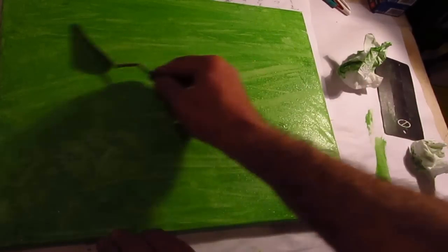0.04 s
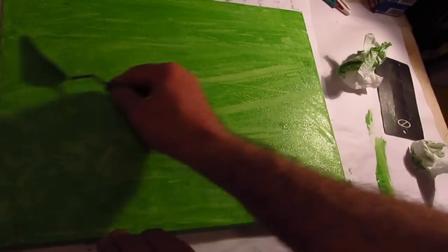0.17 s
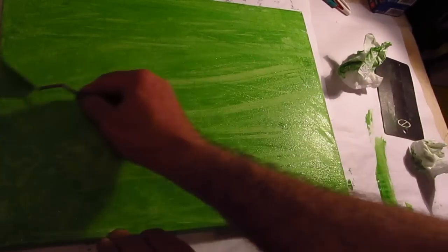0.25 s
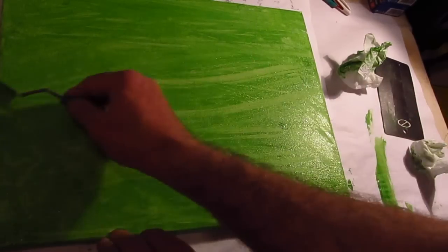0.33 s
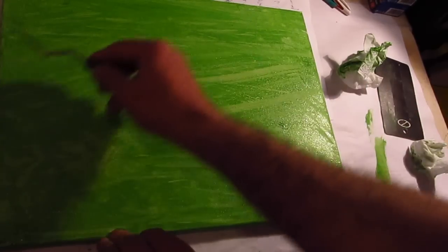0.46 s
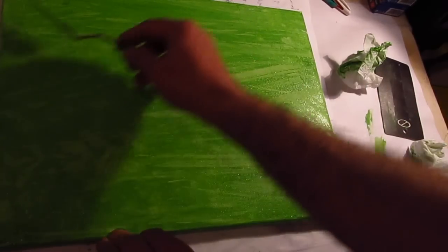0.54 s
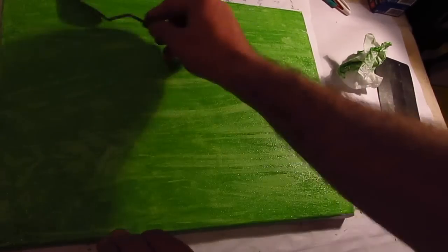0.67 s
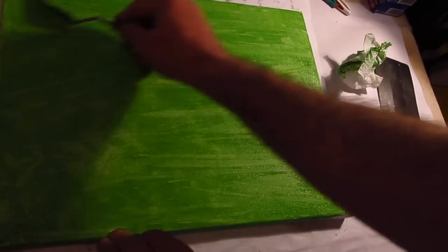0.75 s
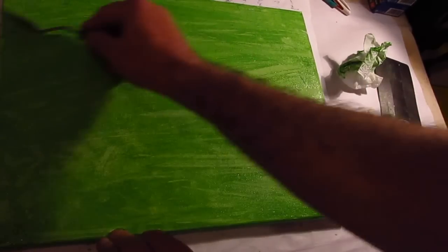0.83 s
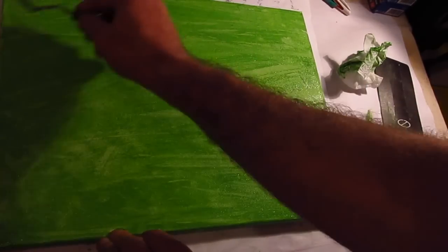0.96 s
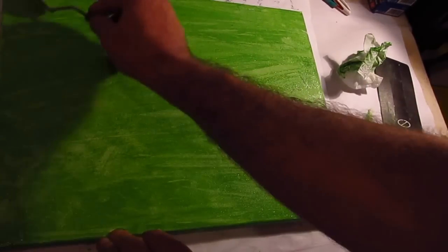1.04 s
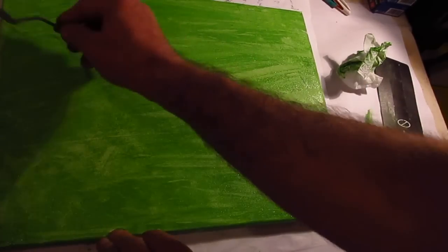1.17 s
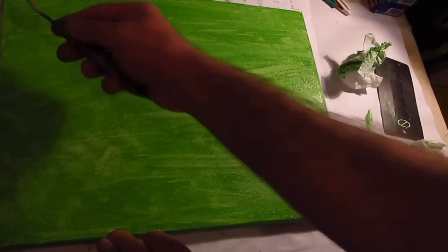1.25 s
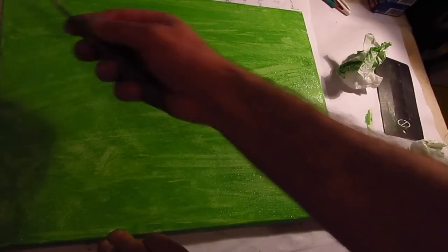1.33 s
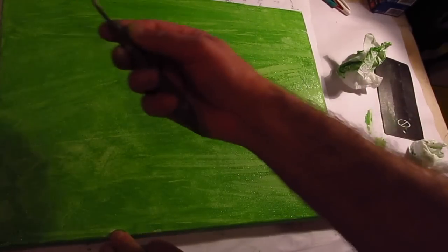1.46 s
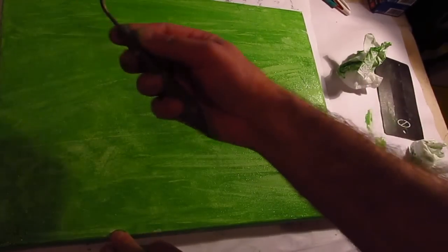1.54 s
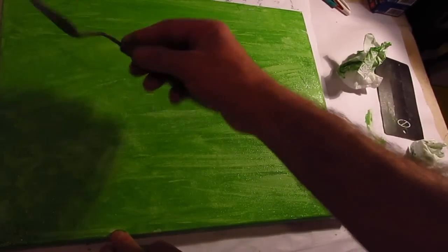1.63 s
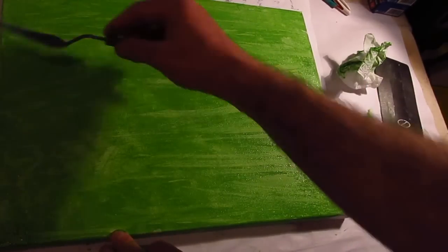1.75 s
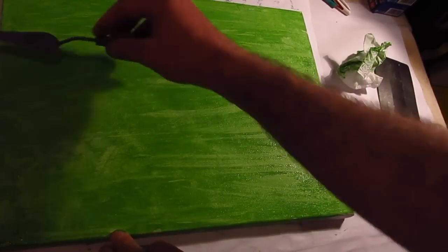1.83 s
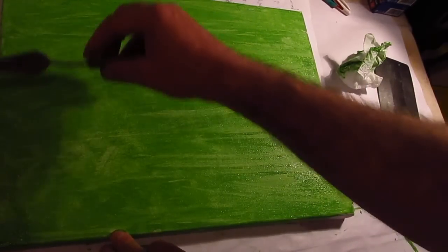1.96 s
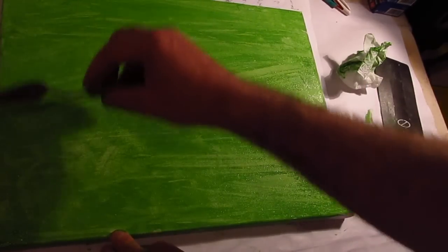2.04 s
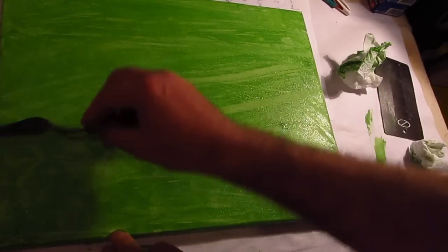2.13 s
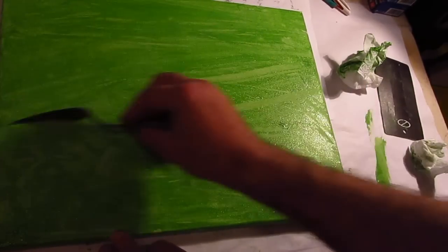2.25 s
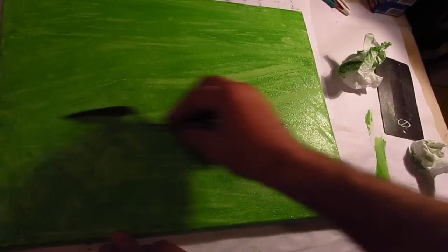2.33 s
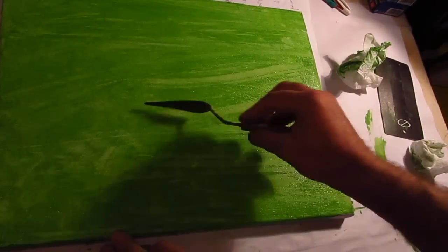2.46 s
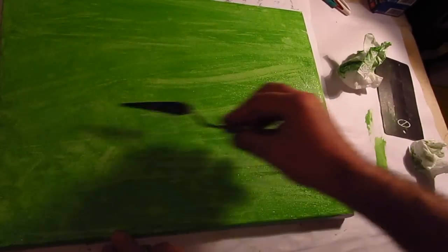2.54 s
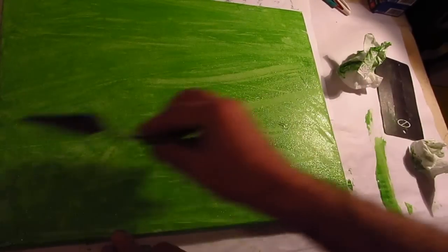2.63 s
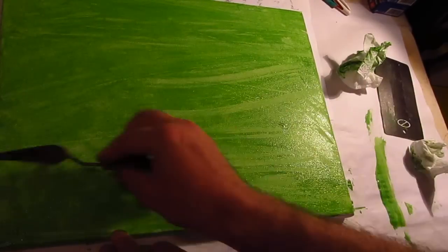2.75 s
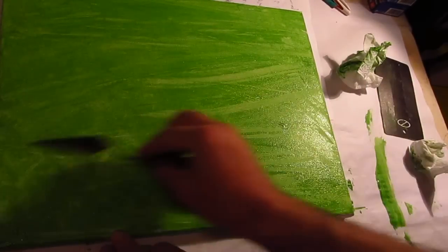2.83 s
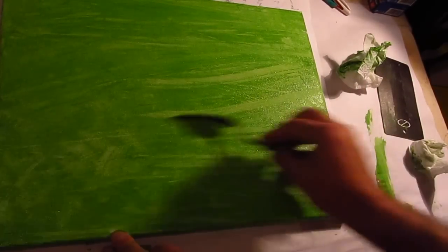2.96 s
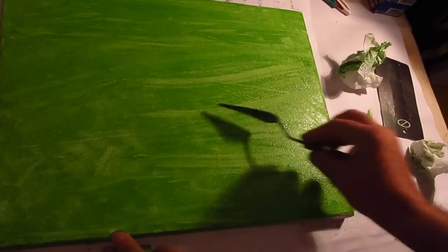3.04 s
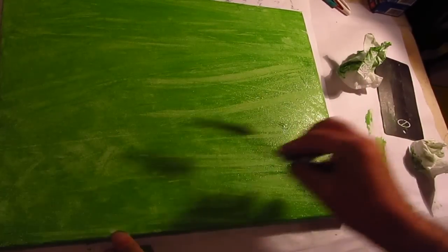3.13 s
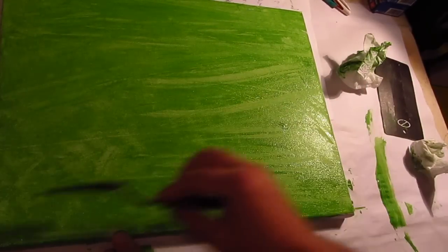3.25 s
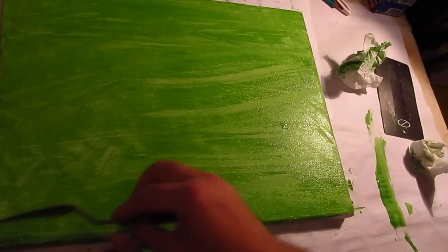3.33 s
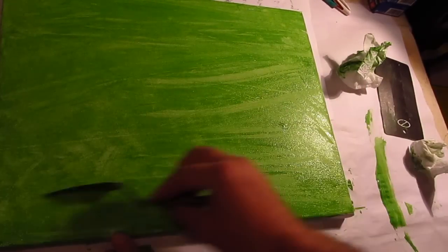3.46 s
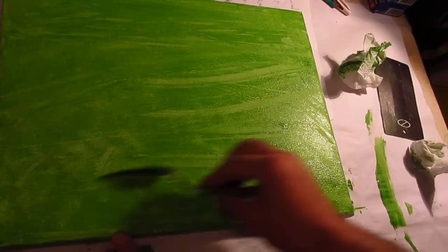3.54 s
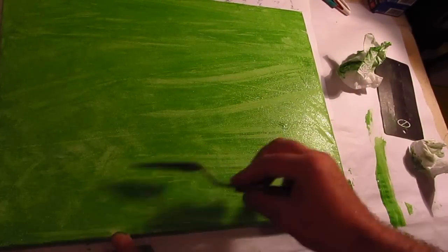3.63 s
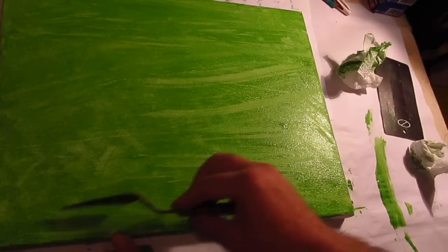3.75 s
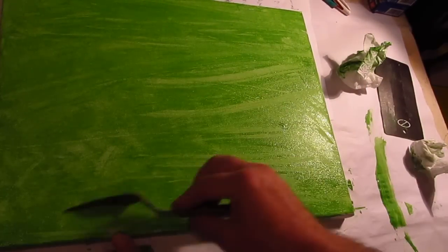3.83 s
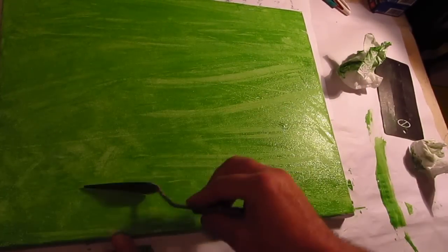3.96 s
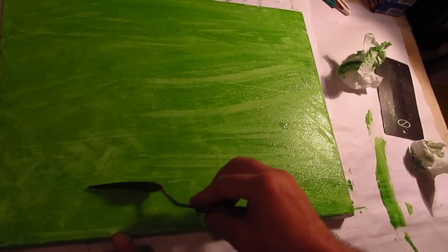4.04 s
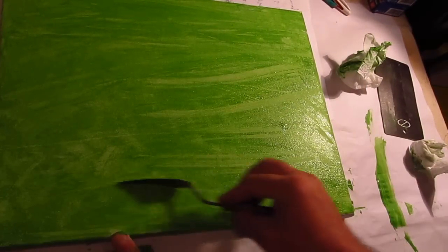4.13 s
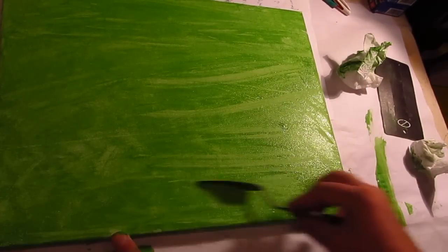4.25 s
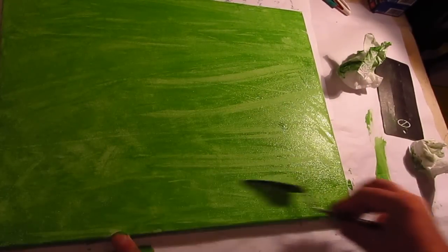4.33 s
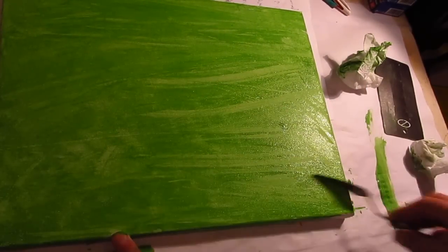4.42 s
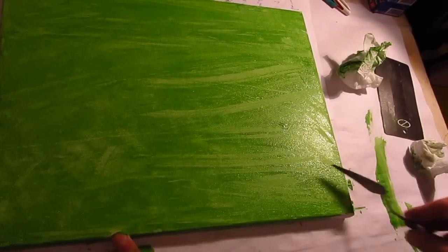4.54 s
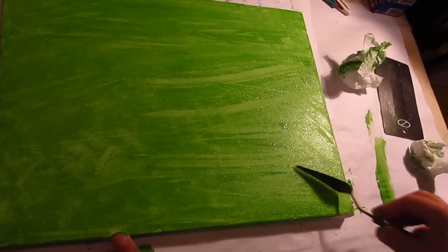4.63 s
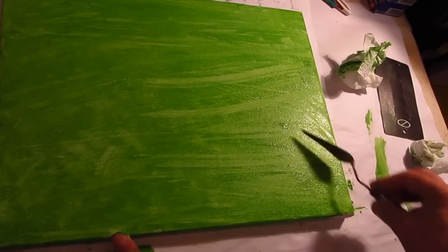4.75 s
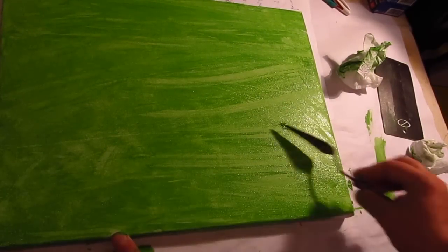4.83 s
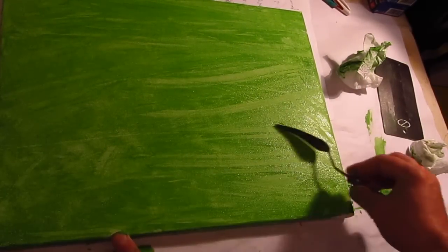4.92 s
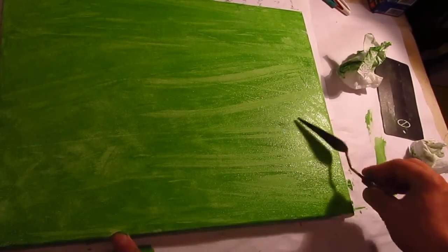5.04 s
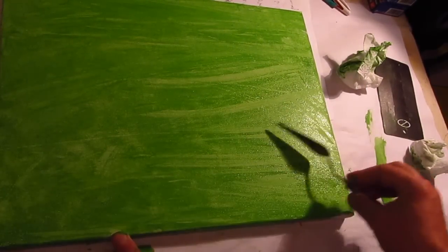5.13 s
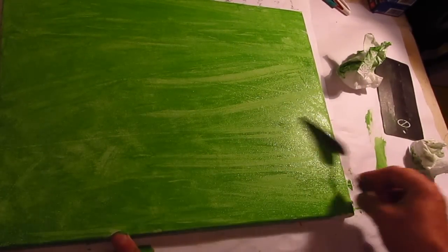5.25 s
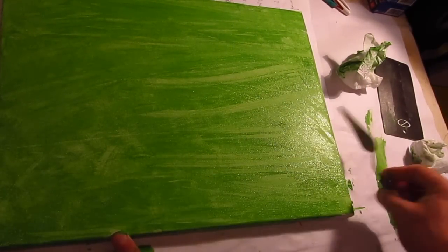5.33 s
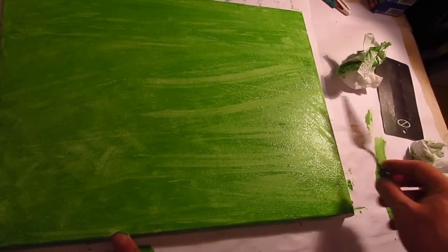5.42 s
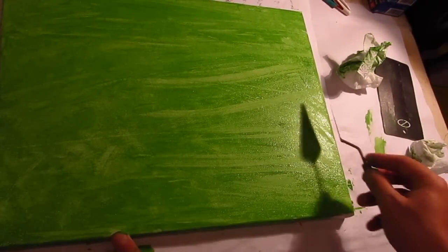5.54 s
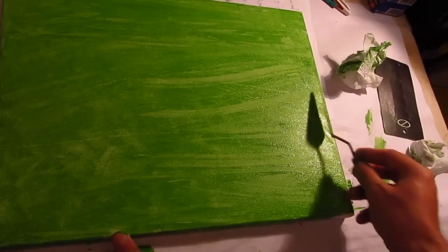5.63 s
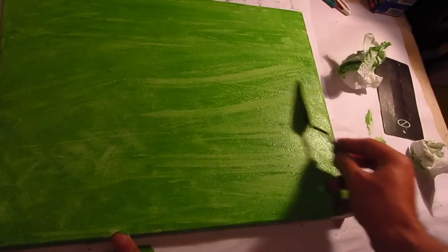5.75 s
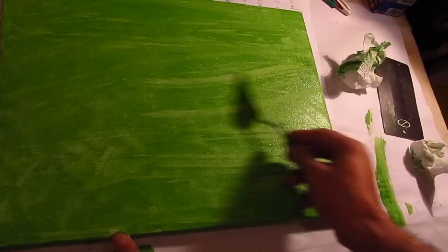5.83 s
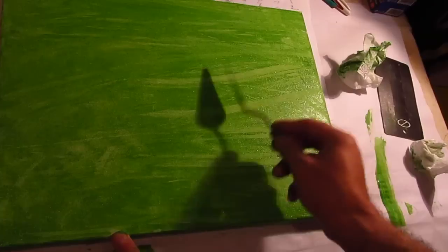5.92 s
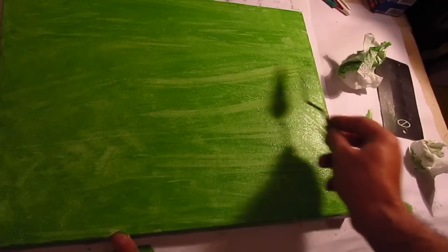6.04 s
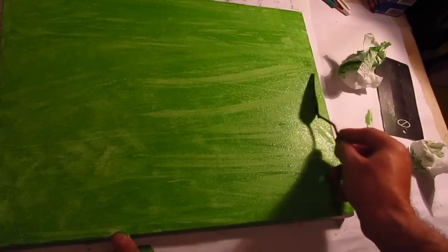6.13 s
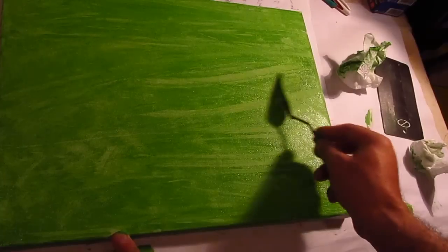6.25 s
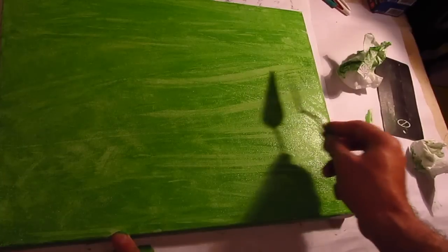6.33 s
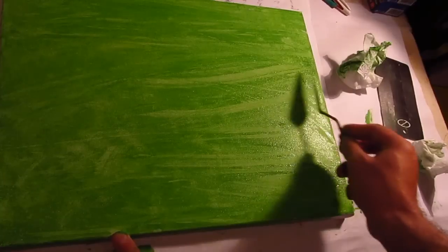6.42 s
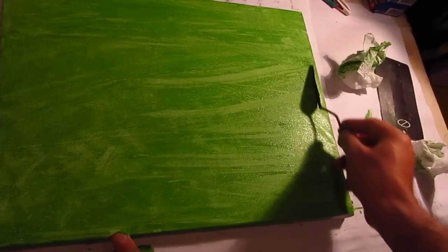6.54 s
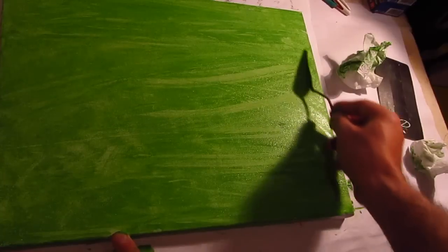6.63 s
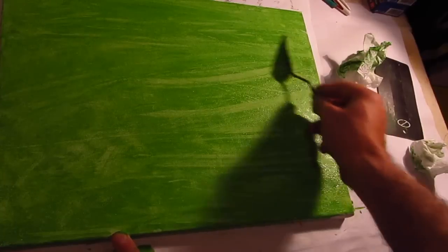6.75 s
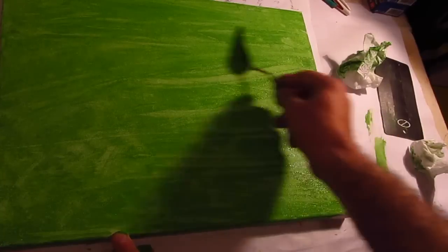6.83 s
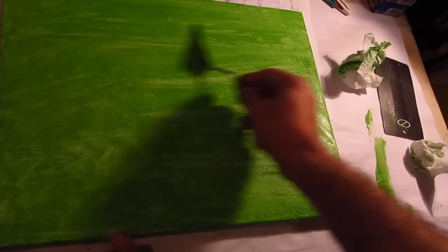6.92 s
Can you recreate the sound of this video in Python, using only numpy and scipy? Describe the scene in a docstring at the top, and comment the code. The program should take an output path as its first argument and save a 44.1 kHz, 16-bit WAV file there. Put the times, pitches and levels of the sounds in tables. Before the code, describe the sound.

Gritty, papery scrapes of a thin flexible metal blade on slack, drum-like cloth, heard in stereo from very near. Strokes are brief and irregular, with soft thumps and ticks at landing and a faint, quickly dying metallic ring on lifting. Pauses of a second or so early on give way to quicker strokes later. The last stroke is long and swells. Soft room air and a weak low hum lie beneath, with a short room reflection.

```python
"""In a small quiet room with a low hum, a steel painting knife spreads wet paint over a stretched canvas.
Fourteen uneven strokes are heard close by. Small drum-like taps come from decaying sines and noise.
The rasp is clicks and noise, coloured by the cloth wherever the blade is, with a buzz from the threads.
The steel rings faintly after it lifts: a few decaying, unsteady sines. Faint swishes are filtered rasp."""
import sys
import numpy as np
from scipy import signal
from scipy.fft import rfft, irfft, next_fast_len
from scipy.io import wavfile

SR = 44100
rng = np.random.default_rng(int(sys.argv[2]) if len(sys.argv) > 2 else 0)


def put_to_file(sound):
    """Save the sound as 16-bit audio at rate SR, in the file named by the first command-line argument."""
    columns = np.atleast_2d(sound).T  # one column per channel
    safe = np.clip(columns, -1, 1)
    whole_steps = np.round(safe * 32767)
    wavfile.write(sys.argv[1], SR, whole_steps.astype(np.int16))


N = 307818  # length of the scene in samples


def amp(db):
    """Turn decibels into a gain."""
    return 10 ** (np.asarray(db) / 20)


def unit(x):
    """Scale to rms 1."""
    return x / np.sqrt(np.mean(x ** 2))


def walk(n, rate):
    """Smooth chance with rms 1 that changes about rate times a second."""
    knots = rng.standard_normal(4096)
    return unit(np.interp(np.arange(n) / SR * rate, np.arange(len(knots)), knots))


def colour(x, points, bumps=()):
    """Filter by a curve of (pitch_hz, level_db) plus broad bumps (pitch_hz, width_octaves, level_db)."""
    size = next_fast_len(x.shape[-1] + 2048)
    octave = np.log2(np.maximum(np.arange(size // 2 + 1) * SR / size, 1))
    hz, db = np.transpose(points)
    curve = np.interp(octave, np.log2(hz), db)
    for centre, width, rise in bumps:
        curve = curve + rise * np.exp(-.5 * ((octave - np.log2(centre)) / width) ** 2)
    spectrum = rfft(x, size) * amp(curve)
    return irfft(spectrum, size)[..., :x.shape[-1]]


def fade(t60, size):
    """A decay of 60 dB in t60 seconds."""
    return np.exp(-np.log(1000) * np.arange(size) / SR / t60)


def ring(hz, t60, size):
    """One struck mode: a sine that dies away."""
    return np.sin(2 * np.pi * hz * np.arange(size) / SR) * fade(t60, size)


def scatter(t60, size):
    """Dense dying reflections of unit energy, different at each ear."""
    tail = rng.standard_normal((2, size)) * fade(t60, size)
    return unit(tail) / np.sqrt(size)


def add(out, x, start):
    """Mix x into out from a given sample on."""
    start = max(int(start), 0)
    n = min(x.shape[-1], out.shape[-1] - start)
    out[:, start:start + n] += x[..., :n]


HUM_HZ = 213.5  # centre of the wavering pitch
AIR_DB, HUM_DB = -55, -62  # levels before their slow wavering
# spectrum of the room air, only its shape matters: pitch_hz, level_db
AIR_SPECTRUM = [(25, -19), (60, -3), (130, -1), (300, 3.5), (600, -0.5), (1300, -5), (2000, -10.5),
                (2350, -13), (2800, -14), (4200, -15), (5500, -23), (7400, -20.5), (10000, -38.5),
                (13000, -49.5)]


def air():
    """Quiet room noise, more alike at both ears in the bass, and a slightly wavering hum."""
    mid = colour(rng.standard_normal(N), AIR_SPECTRUM)
    side = colour(rng.standard_normal(N), AIR_SPECTRUM)
    side = colour(side, [(60, -6.0), (270, -9), (1200, -5.0), (4000, 0.5)])
    noise = (mid + side * np.array([[1], [-1]])) / np.std(mid) * amp(AIR_DB)
    noise_waver = amp(.6 * walk(N, 3))
    hum_phase = 2 * np.pi * np.cumsum(HUM_HZ + 1.5 * walk(N, 9)) / SR
    hum = np.sin(hum_phase) * amp(2 * walk(N, 7))
    return noise * noise_waver + np.sqrt(2) * amp(HUM_DB) * hum


def room(x, room_db=-19, t60=0.23, size=16384):
    """A small furnished room answers shortly after the direct sound."""
    gap = SR // 150  # samples before the first reflection
    walls = np.pad(scatter(t60, size), ((0, 0), (gap, 0)))
    return amp(room_db) * signal.fftconvolve(x, walls, axes=1)[:, :N]


def weave(n, catches_per_s=4500, spread_db=3, smear_db=-2, judder_db=0.9, judder_rate=380):
    """The edge catches on threads in tiny clicks, wet paint smears between them, and the blade judders."""
    caught = rng.random(n) < catches_per_s / SR
    catches = caught * rng.choice([-1, 1], n) * amp(spread_db * rng.standard_normal(n))
    smear = amp(smear_db) * rng.standard_normal(n)
    return (unit(catches) + smear) * amp(judder_db * walk(n, judder_rate))


def travel(x, cloth_t60=0.043, echo_db=-2, size=5120):
    """Waves bounce across the cloth; their pattern changes as the contact point slides along."""
    out, hop = np.zeros((2, len(x))), size // 2
    for centre in range(0, len(x) + hop, hop):
        start = max(centre - hop, 0)
        at = np.arange(start, min(centre + hop, len(x)))
        piece = x[at] * np.cos(np.pi * (at - centre) / size)  # overlapping pieces blend the patterns
        bounces = scatter(cloth_t60, size=1024)
        add(out, signal.fftconvolve(piece[None], bounces, axes=1), start)
    return x + amp(echo_db) * out


def scrape(n):
    """Tip and heel of the edge rasp separately; the ears differ most in the bass and are most alike near 1 kHz."""
    tip = travel(weave(n))
    mid, side = tip.mean(axis=0), (tip[0] - tip[1]) / 2
    heel = amp(-2.5) * weave(n)
    side = colour(side + heel, [(300, 3.5), (1000, -6.0), (2500, -3.0), (8000, -0.5)])
    return mid + side * np.array([[1], [-1]])


# moments when the blade barely grazes the paint: middle_s, length_s, level_db (before fading in and out),
# resonance_hz
SKIMMING_MOMENTS = [(0.503, 0.084, -59.5, 3980), (1.77, 0.49, -59, 2330), (2.651, 0.22, -59.5, 4515),
                    (3.249, 0.093, -53, 3580), (3.679, 0.044, -49.5, 2880), (3.735, 0.075, -50, 2870)]


def grazes():
    """Faint swishes as the blade skims the surface between strokes."""
    out = np.zeros((2, N))
    for middle_s, length_s, level_db, resonance_hz in SKIMMING_MOMENTS:
        n = int(length_s * SR)
        swish = colour(scrape(n), [(500, -17), (2400, 4.5), (7500, -2.5), (12000, -21.0)],
                       [(resonance_hz, .06, 10)])
        add(out, unit(swish) * np.hanning(n) * amp(level_db), (middle_s - length_s / 2) * SR)
    return out


# the whole canvas as a slack drum, strength before each tap's own: pitch_hz, level_db
DRUM_MODES = [(184, -18.5), (295, -2), (370, -6.5), (460, -18.5)]
# shorter waves in the canvas: pitch_hz, level_db, t60_s
CANVAS_MODES = [(835, -7, 0.055), (924, 10, 0.0081), (1300, -6, 0.032), (1610, -8.5, 0.046),
                (2150, -5.5, 0.012), (2890, -11.5, 0.05)]
# the blade lands or knocks, 2 ms after start_s: start_s, peak_db, drum_db (before the common drum gain),
# drum_t60_s, tick_db (edge tick, before the common tick gain), snap_db (treble bump of the tick)
LANDINGS = [(.698, -25.5, -16, .08, -11, -1), (1.061, -18, -10.5, 0.048, -9.5, -8),
            (2.076, -41, -13, 0.045, -37, -3), (2.168, -13, -17, .1, -20.5, -0.5),
            (2.793, -17, -23, .075, -20, -3), (3.44, -16, -17.5, .083, -10, 3.5),
            (3.731, -33.5, -10, .05, 1, -1), (3.825, -12.8, -29, 0.075, -19.5, 4.5),
            (4.037, -37, -11, 0.062, -24, -3), (4.671, -12, -2, 0.035, -9, -6),
            (4.904, -19, -27, .085, -22, 1), (5.203, -17.5, -25.5, .13, -19.5, 4),
            (5.699, -23.5, -23.5, 0.11, -25.5, 0), (6.135, -19, -28.5, .09, -11, 6.5),
            (6.495, -30, -20, .056, -18, 12), (6.798, -11, -28, .09, -21, 0)]


def taps(drum_gain_db=19, tick_gain_db=14, tick_t60=0.033, drum_rise_s=0.0084, size=8192):
    """The landing blade thumps the cloth like a slack drum, with a short steel tick on top."""
    out = np.zeros((2, N))
    swell = 1 - np.exp(-np.arange(size) / SR / drum_rise_s)  # the whole cloth takes a moment to move
    no_bass = signal.butter(2, 160, "high", fs=SR, output="sos")
    for start_s, peak_db, drum_db, drum_t60, tick_db, snap_db in LANDINGS:
        drum = [(hz, mode_db + drum_db + drum_gain_db, drum_t60) for hz, mode_db in DRUM_MODES]
        modes = drum + CANVAS_MODES
        detune = 1 + 0.045 * rng.standard_normal(len(modes))
        place_db = 2.3 * rng.standard_normal(len(modes))  # each spot favours other modes
        cloth = 0
        for k, (hz, mode_db, t60) in enumerate(modes):
            rise = swell if k < len(drum) else 1
            sign = (-1) ** k
            cloth = cloth + amp(mode_db + place_db[k]) * rise * sign * ring(hz * detune[k], t60, size)
        tick = colour(rng.standard_normal((2, size)) * fade(tick_t60, size),
                      [(300, -20.5), (1000, 12.5), (3500, 11.0), (5500, 4.5), (11000, -13)],
                      [(9500, 0.61, snap_db)])
        # the taps carry no deep bass
        tap = signal.sosfilt(no_bass, cloth + amp(tick_db + tick_gain_db) * tick)
        peak = np.abs(tap.mean(axis=0)).max()
        add(out, tap / peak * amp(peak_db), (start_s + 0.002) * SR)
    return out


# modes of the free steel blade, in four families (bending, twisting, tip, upper modes), each a list of:
# pitch_hz, level_db, t60_s
BLADE_FAMILIES = [
    [(2363, 0, .16), (2934, -12, .14), (3774, -16, .26)],
    [(2657, 0, .14)],
    [(7556, 0, .22)],
    [(5065, -7, .11), (6481, -2, .12), (8175, -4, .12), (8890, -4, .11), (9590, -12, .11),
     (10480, -12, .12)],
]


def blade(since_lift, family_db, lift_s=0.02, waver_hz=10, waver_db=1.6):
    """Wet paint damps the steel until it lifts; then it rings briefly, unsteady in the hand."""
    n, out = len(since_lift), 0
    freed = np.exp(np.minimum(since_lift, 0) / lift_s)
    for family, level_db in zip(BLADE_FAMILIES, family_db):
        for hz, db, t60 in family:
            cycles = np.cumsum(hz + waver_hz * walk(n, 90)) / SR
            phase = 2 * np.pi * (cycles + rng.random((2, 1)) / 3)  # each ear has its own phase
            decay = np.exp(-np.log(1000) * np.maximum(since_lift, 0) / t60)
            out = out + np.sin(phase) * decay * amp(level_db + db + waver_db * walk(n, 69.3))
    return np.sqrt(2) * freed * out


def threads(hz, overtone_db=-7, uneven_db=3):
    """The edge bumps over unevenly spaced threads: a rough buzz whose pitch follows the speed."""
    phase = 2 * np.pi * np.cumsum(hz * (1 + .08 * walk(len(hz), 160))) / SR
    tone = np.sin(phase) + amp(overtone_db) * np.sin(2 * phase)
    return unit(tone * amp(uneven_db * walk(len(hz), 119.8)))


def cloth_resonance(t, hz, glide_hz_per_s, width_hz=130, drift=0.04):
    """Cloth between blade and frame rings in a narrow band that slides and comes in patches."""
    n = len(t)
    phase = 2 * np.pi * np.cumsum((hz + glide_hz_per_s * t) * (1 + drift * walk(n, 14))) / SR
    patches = amp(3.5 * walk(n, 25))
    band = walk(n, width_hz) * np.cos(phase) + walk(n, width_hz) * np.sin(phase)
    return unit(band * patches)


# moments when the edge sticks and breaks free in mid-stroke: middle_s, jump_db (change in level)
STICKING_MOMENTS = [(2.472, 4), (2.962, 5.5), (3.028, 3), (4.134, 3), (4.214, -3), (4.343, 1.5),
                    (4.501, 6.5), (4.947, 7), (5.061, -2), (5.241, 6.5), (5.723, 3), (5.744, 6.5),
                    (6.191, 1), (6.537, 0.5), (6.586, -1), (6.646, 2)]


def snags(width_s=0.004):
    """Gain of the strokes: it jumps for a moment wherever the edge sticks and breaks free."""
    t = np.arange(N) / SR
    jumps_db = 0
    for middle_s, jump_db in STICKING_MOMENTS:
        jumps_db = jumps_db + jump_db * np.exp(-np.minimum(((t - middle_s) / width_s) ** 2, 20))
    return amp(jumps_db)


FLICK_S = 0.0097  # half-width of the flick as the blade leaves


def effort(t, length, level_db, swell_s, swell_db, ease_db, flick_db):
    """Level of a stroke in dB: it swells smoothly, eases off towards the end and leaves with a flick."""
    rising = np.cos(np.pi / 2 * np.minimum(t / swell_s, 1)) ** 2
    easing = np.clip((t - swell_s) / max(length - swell_s, 1 / SR), 0, 1) ** 2
    flick = np.exp(-((t - length) / FLICK_S) ** 2)
    return level_db - swell_db * rising - ease_db * easing + flick_db * flick


RELEASE_DB_PER_S = 426  # how fast the rasp dies after the stroke
# the blade skips unevenly, most of all while it touches lightly (the second is per 10 dB below full effort)
SKIP_DB, LIGHT_SKIP_DB, SKIPS_PER_S = -0.24, 0.97, 91
# the edge crosses the threads faster the harder it is pushed; above OUTRUN_HZ it hardly drives the drum
THREAD_RATE_DB_PER_DB, OUTRUN_HZ = 0.24, 470
PAN_LEFT_DB, PAN_RIGHT_DB = 1, -2.5  # left minus right level at the left and right edges of the canvas
LEFT_LAG_MS = -0.046  # delay of the left ear at the left edge; negative means it hears first
# spectrum of steel on painted weave, only its shape matters: pitch_hz, level_db
RASP_SPECTRUM = [(110, -75.5), (190, -42.5), (300, -12), (450, -20), (600, -8.5), (720, -12.5), (830, 1),
                 (1050, 1.5), (1400, 0), (2300, -0.5), (3000, 0.5), (5500, -1), (9800, -7), (11900, -25)]


def stroke(t, effort_db, length, lie, rasp_db=0.36, thread_chop_db=1.0):
    """A rasp coloured by the lie of the blade; faster sliding is louder, brighter and higher in pitch."""
    (place, drum, frame, cloth, flex, hiss, steel_low, steel_middle, steel_high, bright_per_db,
     top_hz, buzz_db, resonance_hz, glide_hz_per_s, resonance_db, *ring_db) = lie
    level_db = effort_db - RELEASE_DB_PER_S * np.maximum(t - length, 0)
    slack_db = np.maximum(level_db - effort_db.max(), -20)  # 0 at full effort, negative below it
    skip_db = SKIP_DB - LIGHT_SKIP_DB * slack_db / 10
    level_db = level_db + skip_db * walk(len(t), SKIPS_PER_S) * (t < length)
    thread_hz = top_hz * amp(THREAD_RATE_DB_PER_DB * slack_db)
    buzz = threads(thread_hz)
    bumps = [(296, 1.0, drum), (520, 0.32, frame), (910, 0.54, cloth), (9100, 0.81, hiss)]
    # the flexing blade adds a resonance between two antiresonances
    bumps += [(1646, 0.089, flex), (1440, 0.084, -flex / 2), (2040, 0.15, -flex / 2)]
    # pressed into the paint, the steel has three broad resonances
    bumps += [(2970, 0.066, steel_low), (4500, 0.067, steel_middle), (6340, 0.3, steel_high)]
    chopped = scrape(len(t)) * amp(thread_chop_db * np.tanh(buzz))
    rasp = colour(chopped, RASP_SPECTRUM, bumps)
    rasp = rasp / np.std(rasp.mean(axis=0))
    treble = colour(rasp, [(1500, -31.5), (4000, -5)])
    bass = colour(rasp, [(400, 6.5), (640, -26)])
    drum_drive = 1 / (1 + (thread_hz / OUTRUN_HZ) ** 6)
    rasp = rasp + treble * (amp(bright_per_db * slack_db) - 1) + bass * (drum_drive - 1)
    pressed = np.clip((length - t) / FLICK_S, 0, 1)  # the cloth resonates only under the blade
    resonance = pressed * cloth_resonance(t, resonance_hz, glide_hz_per_s)
    rasp = rasp + amp(buzz_db) * buzz + amp(resonance_db) * resonance
    lag = int(round(LEFT_LAG_MS * (1 - place) * SR / 1000))
    rasp[0] = np.roll(rasp[0], lag)
    pan_db = PAN_LEFT_DB + place * (PAN_RIGHT_DB - PAN_LEFT_DB)
    pan = amp(np.array([[pan_db], [-pan_db]]) / 2)
    return pan * (amp(level_db + rasp_db) * rasp + blade(t - length, ring_db))


# one row per stroke; levels in dB are relative settings that the later steps build on:
#   effort: start_s, length_s, level_db, swell_s, swell_db (depth), ease_db (easing off), flick_db (closing flick)
#   lie of the blade: place (0 left - 1 right), drum_db, frame_db, cloth_db, flex_db (blade), hiss_db (edge)
#   pressed steel: steel_low_db, steel_middle_db, steel_high_db (resonances), bright_per_db (treble dB per effort dB)
#   pitch: top_hz (fastest thread rate), buzz_db, resonance_hz (cloth), glide_hz_per_s, resonance_db
#   ring of the steel at lift-off: bending_db, twisting_db, tip_db, upper_db
SHAPED_STROKES = [ (0, 0.33, -21, 0.25, -1, 16, 1,   .11, 3, 3, 6, 3, 2,   4, -1.5, 2, 0.68,   340, -18.5, 1048, -600, -10.5,   -49, -43, -56, -65),
                  (.702, .17, -18, .082, 14.5, 3, 2,   .1, -2.5, 6.5, 0, -3, 2.5,   1, -0.5, -1, 0.74,   542, -18.5, 1193, 799.5, -20,   -34, -32, -53, -44),
                  (1.067, 0.076, -19.5, .035, 19, 5.5, -.5,   .12, -5, 8, -5.5, 2.5, 0,   -4, -2, -2.5, .78,   388, -22.5, 1244, 0, -15,   -43, -30, -44, -36),
                  (2.188, 0.27, -28.5, 0.0644, 20, 2.5, 6,   .32, 8.5, 0.5, -1, -5, 2.5,   2.5, 0.5, -0.5, 0.59,   327, -25.5, 979, 7, -18,   -41, -46, -44, -36),
                  (2.801, .22, -19, .11, 16.5, 8, 3.5,   0.53, 6, -0.5, 0, -1.5, 0.5,   1.5, -2, 1, 1,   616.4, -21, 980, -500, -22,   -39, -49, -41, -32),
                  (3.448, .15, -21, 0.1215, 9.5, 5, 4.5,   0.29, 8.5, -5.5, -6, 6, -1.5,   0.5, -2, -1, .7,   348, -23.5, 897, 3, -15.5,   -40, -36, -46, -35),
                  (3.837, .1, -19.5, 0.064, 16, 8.5, 3,   0.41, 8, -6, -3.5, 5.5, -3.5,   3, 1, 2.5, 0.82,   352, -22, 1602, -2, -19,   -54, -50, -51, -42),
                  (4.683, 0.071, -19, 0.049, 6, 5, 2.5,   0.69, 0, -2, 2, 3.5, -4,   0.5, 0.5, 0.5, 0.85,   608, -32, 1817, -1500, -8,   -35, -44, -34.5, -31),
                  (4.929, 0.1306, -27, 0.0654, 25.5, 2.5, 5,   .84, 8, -1.5, 2, -9.5, 0.5,   1, -1, -1, .6,   388, -21, 1076, 299, -9.5,   -52, -52, -35.5, -35),
                  (5.212, .11, -17, .05, 19.5, 0, .5,   0.56, 4, 5, 0, 0.5, -4.5,   0.5, -1.5, -0.5, .78,   590, -21.5, 1005, 0.5, -13,   -22.5, -46, -40, -31.5),
                  (5.709, .17, -15.5, 0.12, 14, 6, 4.5,   0.79, -2, 2.5, 0, -0.5, -8,   1.5, 0.5, 6.5, 0.8,   780, -29.5, 988, 1301, -17,   -40.5, -45, -37.5, -25),
                  (6.15, .13, -17, 0.053, 28.5, -1, -2,   0.69, -2.5, -3, 5.5, 1, 1.5,   1, -1.5, 2, 0.85,   659, -27.5, 1024, -900, -14,   -47, -34.5, -51, -40),
                  (6.498, .54, -16, 0.34, 27, 3.5, 2,   0.63, 8, -4.5, 5, 0.5, 4.5,   5.5, 4, 1, .25,   580, -26, 801, 851, -14.5,   -53, -53, -50, -52),
                  ]
# the one long scrape, pushed along in surges: time_s, level_db (rasp, before skips, snags and later steps)
SCRAPE_SURGES = [(4.034, -39.5), (4.056, -44.5), (4.062, -34.5), (4.098, -34), (4.107, -28), (4.133, -29.5),
                 (4.145, -31), (4.187, -34.5), (4.216, -29.5), (4.255, -30), (4.268, -23), (4.334, -25.5),
                 (4.435, -18.5), (4.489, -22), (4.501, -26.5)]
# one row for the long scrape, with the columns of a stroke from place to upper_db, same units
SCRAPE_LIE = (0.58, 2, 4.5, -6, 7, -6.5,   1.5, 2, 1.5, 0.4,   375.5, -24.5, 1689.5, 57.5, -13.5,   -43.5,
              -55.5, -43, -40.5)


def strokes():
    """Thirteen strokes of one swelling and easing shape, and the long scrape pushed along in surges."""
    out = np.zeros((2, N))
    t = np.arange(SR * 3 // 4) / SR
    for start_s, length, level_db, swell_s, swell_db, ease_db, flick_db, *lie in SHAPED_STROKES:
        effort_db = effort(t, length, level_db, swell_s, swell_db, ease_db, flick_db)
        add(out, stroke(t, effort_db, length, lie), start_s * SR)
    time_s, surge_db = np.transpose(SCRAPE_SURGES)
    effort_db = np.interp(time_s[0] + t, time_s, surge_db)
    add(out, stroke(t, effort_db, time_s[-1] - time_s[0], SCRAPE_LIE), time_s[0] * SR)
    return out * snags()


def thin_bass(x, edge_hz=490, loud_db=-18, follow=1.0, order=8, size=1024):
    """The bass thins out while the sound is loud: a low cut slides up with each side's own level."""
    hz, _, frames = signal.stft(x, SR, nperseg=size)
    level = np.sqrt(np.sum(np.abs(frames) ** 2, axis=1, keepdims=True))
    edge = edge_hz * (level / amp(loud_db)) ** follow
    gain = 1 / np.sqrt(1 + (edge / np.maximum(hz, 1)[:, None]) ** (2 * order))
    return signal.istft(frames * gain, SR, nperseg=size)[1][:, :N]


def scene():
    """Knife and canvas in the room; the treble reaches the left side more directly."""
    contact = grazes() + taps() + strokes()
    shade = np.array([(350, -2.0), (1100, 0.5), (3000, 0.47), (6500, 2.5), (11500, 3.0)])  # pitch_hz, left_db
    left = colour(contact[0], shade)
    right = colour(contact[1], shade * [1, -1])  # the opposite gain
    near = np.array([left, right])
    return air() + room(near) + near


TOP_HZ = 12100  # the sound is cut above this
# narrow dips in the treble: pitch_hz, width_hz
TREBLE_DIPS = [(5900, 260), (7850, 300)]


def record(dry):
    """The bass thins under loud sounds, the treble has two narrow dips, and the top is cut steeply."""
    dry = thin_bass(dry)
    for hz, width in TREBLE_DIPS:
        dry = signal.lfilter(*signal.iirnotch(hz, hz / width, fs=SR), dry)
    top_cut = signal.ellip(8, .2, 70, TOP_HZ, fs=SR, output="sos")
    return signal.sosfilt(top_cut, dry)


dry = scene()
out = record(dry)
put_to_file(out)
```